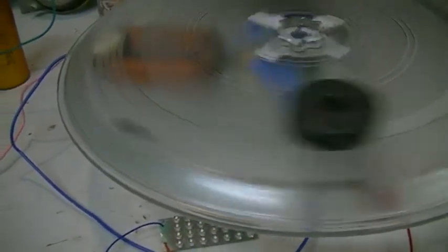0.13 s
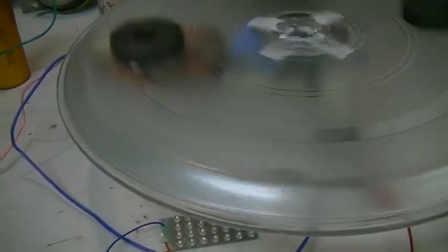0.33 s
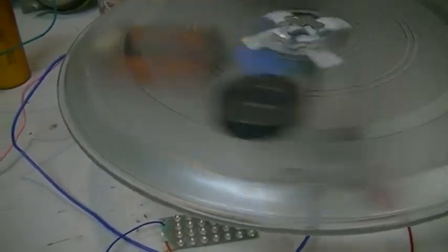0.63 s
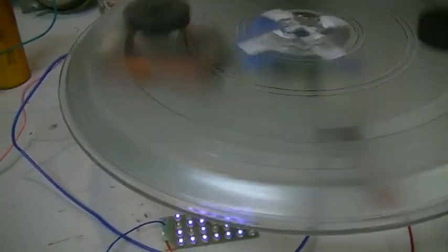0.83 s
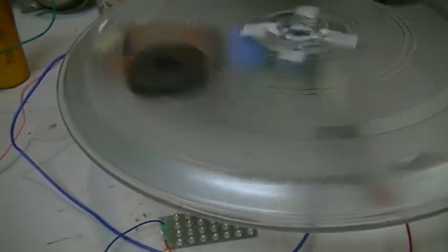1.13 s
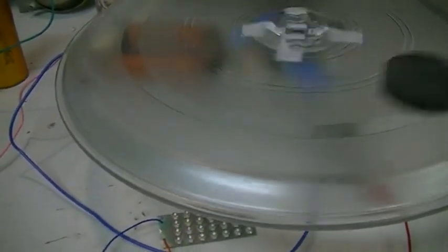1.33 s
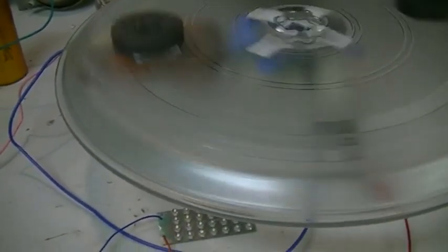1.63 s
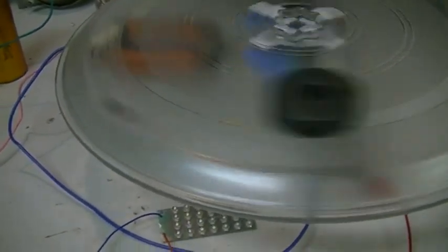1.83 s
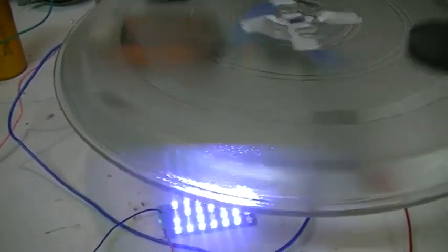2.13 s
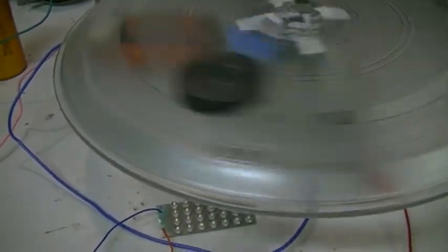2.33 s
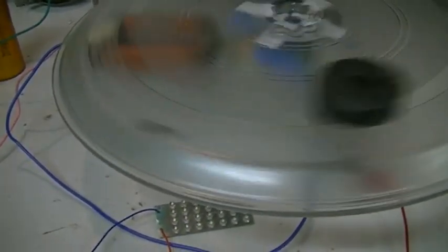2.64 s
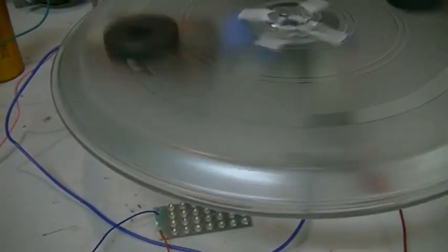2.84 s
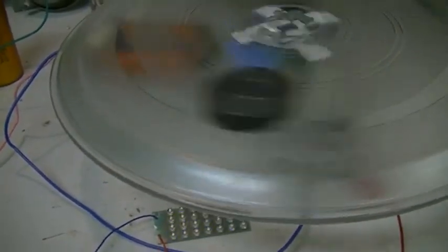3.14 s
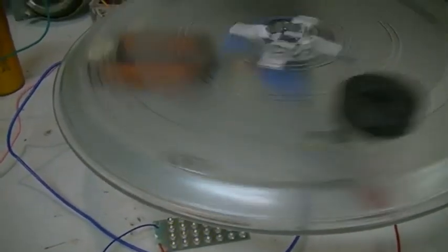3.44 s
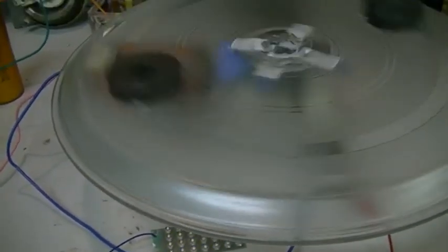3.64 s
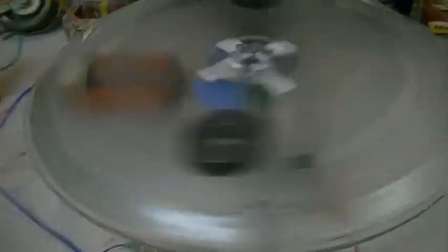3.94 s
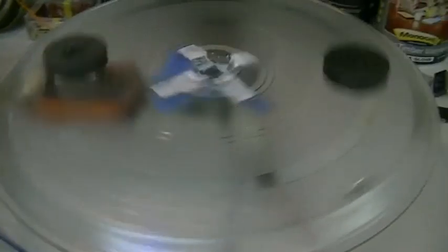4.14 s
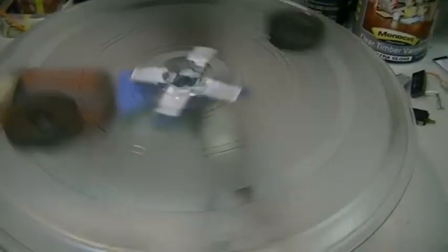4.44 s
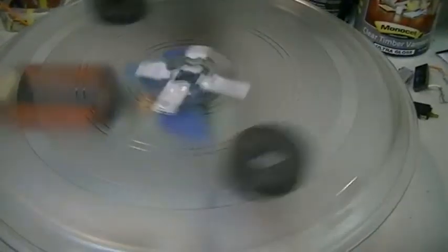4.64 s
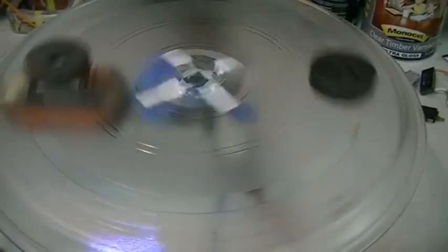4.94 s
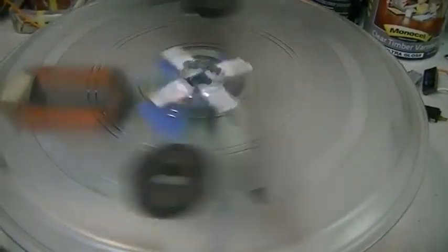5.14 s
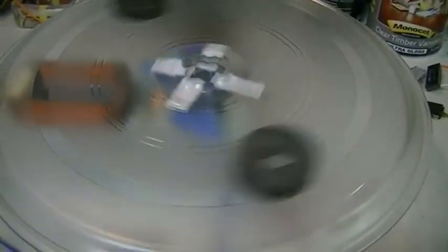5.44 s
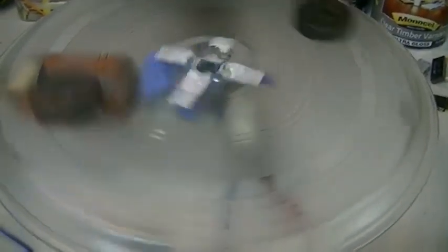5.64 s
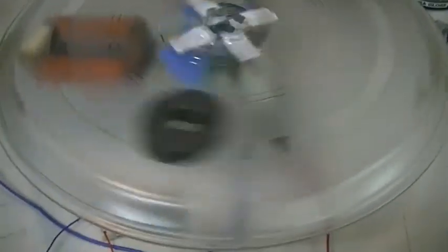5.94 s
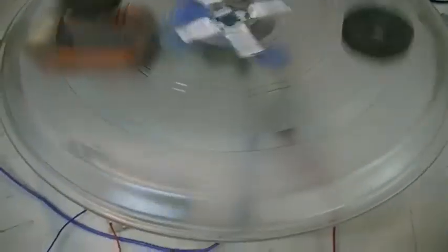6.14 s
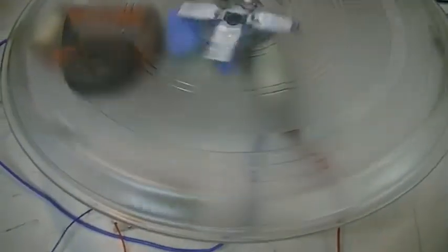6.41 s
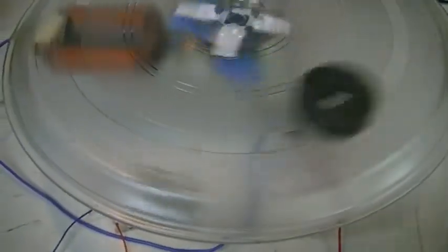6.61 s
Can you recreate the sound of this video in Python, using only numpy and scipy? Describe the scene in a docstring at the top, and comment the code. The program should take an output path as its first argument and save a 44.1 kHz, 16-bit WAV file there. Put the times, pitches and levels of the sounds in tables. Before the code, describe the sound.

Rapid double clicks of a small lever switch, slowly quickening, knock a spinning plastic lid above quiet airy motor whirr.

```python
"""A plastic lid with two magnets spins ever faster over a coil; each magnet in turn trips a micro switch.
On every pass the lever is touched, the contact snaps over, and the lever drags with a fine scrape.
Then the lever flies back in a quick run of blows that thumps the lid: ringing modes plus grainy noise.
Two stray taps, made of short ringing tones, fall between the clicks in the later part.
From start to end, noise through hollow resonances whirrs and broad noise hisses in a small workshop."""
import sys
import numpy as np
from scipy import signal
from scipy.io import wavfile
from scipy.ndimage import uniform_filter1d

SR = 44100
rng = np.random.default_rng(int(sys.argv[2]) if len(sys.argv) > 2 else 0)


def unload_audio(sound):
    """Save the sound as a 16-bit wav file, at the path given as the first command line argument."""
    columns = np.transpose(np.atleast_2d(sound))
    # keep every value between -1 and 1, then stretch to whole-number steps
    steps = np.round(np.clip(columns, -1, 1) * 32767)
    wavfile.write(sys.argv[1], SR, steps.astype(np.int16))


N = 298557

# All dB values are relative: several layers add a further offset where they are mixed.
# Ringing tones of the switch, each strength for the first and second magnet: pitch_hz, t60_s,
# touch_1_db, touch_2_db, snap_1_db, snap_2_db, release_1_db, release_2_db
SWITCH_MODES = [(2780, 0.012, -22, -26, -19, -15, -10, -16), (3283, 0.012, -14, -10, -20, -16, -7, -6),
                (3530, 0.012, -14, -11, -26, -21, -15, -12), (3886, 0.012, -10, -8, -21, -15, -14, -10),
                (4198, 0.025, -2, -2, -17, -16, -9, -5), (4750, 0.012, -13, -9, -16, -13, -8, -1),
                (5040, 0.012, -11, -14, -13, -9, -4, -1), (5260, 0.012, -10, -16, -15, -12, -3, -4),
                (6050, 0.012, -12, -10, -10, -12, -4, -8), (6520, 0.012, -17, -15, -18, -14, -5, -3),
                (6900, 0.012, -17, -14, -3, -5, -3, -5), (7215, 0.02, -17, -13, -3, -3, -9, -6),
                (7520, 0.012, -18, -16, -2, -3, 0, 0), (7805, 0.012, -25, -22, -7, -2, -9, -3),
                (8460, 0.012, -19, -16, -8, -9, -2, 0), (8900, 0.012, -21, -23, -11, -7, -4, -7),
                (9320, 0.012, -17, -17, -17, -13, -12, -8), (10050, 0.012, -19, -19, -11, -4, -10, -5),
                (10560, 0.012, -25, -27, -4, -2, -8, -11), (12020, 0.012, -33, -30, -15, -8, -18, -17),
                (12870, 0.012, -37, -38, -12, -12, -18, -19), (13780, 0.012, -39, -37, -19, -15, -21, -25)]
# Ringing tones of the thin lid: same columns as the switch
LID_MODES = [(344, 0.085, -22, -38, -34, -42, -28.5, -21.5),
             (423.5, 0.19, -35, -16.5, -27, -31, -22.5, -12.5), (584, 0.079, -21, -22, -8, -7, -6, -1),
             (717, 0.029, -12, -12, -20, -23, -0.5, -4), (913, 0.11, -19.5, -6.5, -33, -7.5, -28, -16),
             (1183, 0.04, -25, -17, -24, -7, -8, -14), (1395, 0.028, -11, -15, -29, -26, -13, -8),
             (1532, 0.041, -45, -44, -40, -33, -21, -19), (1925, 0.047, -34, -24, -35, -22, -22.5, -22.5),
             (2165, 0.03, -23, -24, -26, -32, -9.5, -7)]
# Broad noise colour of each kind of blow: pitch_hz, touch_db_per_hz, snap_db_per_hz, release_db_per_hz
CRACK_COLOUR = [(297, -18, -26, -19.5), (1034, -6, 4, -2.5), (2720, -2, -47, -7.5), (4500, 7.5, -29, -6),
                (8000, -9, 5.5, 0.5), (10100, -26, -7, -16), (13000, -28, -7, -30), (16100, -38, -19, -28)]
# Lever rattling on after it flies back: delay_s, level_db (compared with the stop)
RATTLE_BLOWS = [(.0072, -4.5), (.0145, -21), (.0175, -23)]
# Colour of the lever's drag between touch and release: pitch_hz, level_db_per_hz
RUB_COLOUR = [(300, -16), (550, -6), (900, -4), (1650, -16), (2600, -13), (3070, -5), (3600, -11),
              (4680, -15), (10500, -18), (16000, -36)]
# Stray taps: start_s, dull_level_db, bright_level_db
STRAY_TAPS = [(3.7174, -10.5, -18.5), (5.0386, -23, -13.5)]
# Ringing tones in the dull part of a tap: pitch_hz, level_db, t60_s
DULL_TAP_MODES = [(507, -46, 0.013), (860, -16, 0.028), (1146, 0, 0.018), (1490, 1, 0.011),
                  (1850, -6.5, 0.022)]
# Ringing tones in the bright part of a tap: pitch_hz, level_db, t60_s
BRIGHT_TAP_MODES = [(2300, -3, .005), (3200, -2, .005), (4900, -2, .005), (6650, 0, .005), (9000, -8, .004)]
# Reflections of the workshop: pitch_hz, level_db, t60_s
ROOM_BANDS = [(242, -12.5, 0.52), (570, -4, 0.19), (1490, -10.5, 0.29), (3240, -16, 0.37),
              (6450, -19, 0.35), (10800, -23, 0.34), (15000, -20.5, 0.39)]
# Treble of the clicks over time: start_s, level_db
TREBLE_COURSE = [(0.0, 1.8), (3.3, 1.5), (4.2, -1.3), (6.77, -0.22)]
# Hollow resonances of the whirr: pitch_hz, width_hz (sets how quickly each dies), level_db_per_hz
WHIRR_RESONANCES = [(263.4, 23, -8.5), (434.7, 17, -3.5), (541.5, 29.4, 0), (797.6, 65, -3),
                    (1115, 56, -11), (1381, 155, -12), (1970, 105, -16.5), (2258, 98, -12.5),
                    (2483, 78, -13), (3086, 17, -14.5)]
# Loudness of the whirr over time: start_s, level_db
WHIRR_COURSE = [(0.0, -40.5), (2.2, -40.5), (4.5, -42), (6.77, -41)]
# Colour of the hiss: pitch_hz, level_db_per_hz
HISS_COLOUR = [(18, -78), (30, -32.5), (223, -21), (368, -23.5), (547, -12), (659, -4.5), (792, -11),
               (1060, -15.5), (1940, -15), (7090, -29), (13000, -43), (15200, -39.5), (16500, -72)]

# Turning of the lid: speed at the start and its steady gain
PASSES = 17
TURNS_PER_S, SPEEDUP_TURNS_PER_S2 = 1.16323, .02214
# Pairs below: first magnet, second magnet. Angles in degrees where each contact falls
TOUCH_DEG, SNAP_DEG, RELEASE_DEG = (65.37, 242.98), (75.9, 253.07), (101.48, 282.29)
# Rough delays of the lever's stop and bounce after it flies back; each layer shifts them a little
STOP_S, BOUNCE_S = .0035, .0112
# Strength of each blow on the switch
TOUCH_DB, SNAP_DB, BACK_DB = (-10.5, -11.5), (-8.1, -10), (-8, -7)
STOP_DB, BOUNCE_DB = (-5, -5.5), (-16.5, -19.5)
# A faint high noisy onset just before the release
ONSET_S, ONSET_DB = .003, (-34, -25.5)
# Strength of each knock on the lid
LID_TOUCH_DB, LID_SNAP_DB = (-21.5, -22.5), (-23, -26)
LID_STOP_DB, LID_BOUNCE_DB = (-15, -13.5), (-14.5, -19)
LID_GROWS_DB_PER_S = 0.62   # the thump after the release swells as the microphone draws nearer
# Broad crack of touch, snap and release
CRACK_DB, CRACK_T60_S = (-22, -20.5, -17.5), (.036, .034, .026)
RUB_DB, HISS_DB = -43.5, -43.5
TREBLE_HZ, CUTOFF_HZ = 9750, 16700
TOUCH, SNAP, RELEASE = 0, 1, 2   # kinds of blow


def switch(rattle):
    """Metal spring and hard case ring bright and short; the start of the release reaches only high modes."""
    back_s = when(RELEASE_DEG)

    def cluster(spread_s):
        return lambda: chatter(PASSES, spread_s)

    blows = [
        (TOUCH, when(TOUCH_DEG), each(TOUCH_DB) - 3, cluster(0.00078), 0),
        (SNAP, when(SNAP_DEG), each(SNAP_DB) - 6, cluster(0.00096), 0),
        (RELEASE, back_s - ONSET_S, each(ONSET_DB), cluster(0.0012), 4300),
        (RELEASE, back_s, each(BACK_DB) - 6, cluster(0.00059), 4300),
        (RELEASE, back_s + STOP_S - .0006, each(STOP_DB) - 5.5, cluster(0.00044), 0),
        (RELEASE, back_s + BOUNCE_S - .001, each(BOUNCE_DB) - 0.5, cluster(0.00057), 0),
    ]
    for seconds, level_db in rattle:
        blows.append((RELEASE, seconds, level_db - 19, cluster(0.0005), 0))
    return strike(SWITCH_MODES, blows, scatter_db=1.5)


def cracks(rattle):
    """Many small modes of case and bracket blur into a short, grainy coloured noise at each blow."""
    back_s = when(RELEASE_DEG)
    touches = [(when(TOUCH_DEG), each(TOUCH_DB))]
    # the contact sounds alike both ways
    snaps = [(when(SNAP_DEG), each(SNAP_DB)), (back_s, each(BACK_DB) - 1.5)]
    landings = [(back_s + STOP_S - .0004, each(STOP_DB)),
                (back_s + BOUNCE_S - .0006, each(BOUNCE_DB)), *rattle]
    t = np.arange(SR // 10) / SR
    grains = rng.standard_normal((2, N)) * rng.exponential(1, N) ** .7
    noise = list(bands(grains))
    out = 0
    for kind, group in enumerate((touches, snaps, landings)):
        envelope = np.zeros(N)
        fade = (1 - np.exp(-t / .0004)) * from_db(-60 * t / CRACK_T60_S[kind])
        for seconds, level_db in group:
            add(envelope, seconds, from_db(level_db + 9.5), np.tile(fade, (len(seconds), 1)))
        colour = rms_one(sum(from_db(at_hz(CRACK_COLOUR, hz, axis=kind + 1)) * b for hz, b in noise))
        out = out + from_db(CRACK_DB[kind]) * envelope * colour
    return out


def rub():
    """While it is held down the lever drags with a fine grainy scrape."""
    held = np.zeros(N)
    for down, up in zip(when(TOUCH_DEG), when(RELEASE_DEG)):
        held[round(down * SR):round(up * SR)] = 1
    grains = rng.standard_normal((2, N)) * rng.exponential(1, N) ** 0.75
    scrape = rms_one(sum(from_db(at_hz(RUB_COLOUR, hz)) * b for hz, b in bands(grains)))
    return from_db(RUB_DB) * uniform_filter1d(held, size=200) * scrape


def lid():
    """The thin lid takes clean knocks; the sharp stop reaches its high modes, the bounce shakes it all."""
    back_s = when(RELEASE_DEG)
    stop_s = back_s + STOP_S + .0002
    bounce_s = back_s + BOUNCE_S - .0012
    nearer_db = LID_GROWS_DB_PER_S * back_s

    def knock():
        return np.ones((PASSES, 1))

    blows = [
        (TOUCH, when(TOUCH_DEG) + 0.00097, each(LID_TOUCH_DB), knock, 0),
        (SNAP, when(SNAP_DEG) + 0.00105, each(LID_SNAP_DB), knock, 0),
        (RELEASE, stop_s, each(LID_STOP_DB) + nearer_db, knock, 852),
        (RELEASE, bounce_s, each(LID_BOUNCE_DB) + nearer_db, knock, 0),
    ]
    return strike(LID_MODES, blows, scatter_db=2.0)


def taps():
    """Two dry taps close to the microphone ring briefly, rounded by a soft contact."""
    seconds, dull_db, bright_db = np.transpose(STRAY_TAPS)
    count = len(STRAY_TAPS)
    out = np.zeros(N)
    for modes, level_db in ((DULL_TAP_MODES, dull_db), (BRIGHT_TAP_MODES, bright_db)):
        for hz, mode_db, t60 in modes:
            force = np.zeros(N)
            shape = chatter(count, 0.00012) if hz > 2500 else np.ones((count, 1))
            add(force, seconds, from_db(level_db + mode_db), shape)
            out += ring(force, hz, t60)
    return signal.sosfilt(signal.butter(4, 7500, fs=SR, output="sos"), out)


def workshop(x):
    """A dense tail of reflections builds up over a few ms and dies band by band."""
    t = np.arange(SR // 2) / SR
    tail = 0
    for hz, b in bands(rng.standard_normal((2, len(t)))):
        tail = tail + b * from_db(at_hz(ROOM_BANDS, hz) - 60 * t / at_hz(ROOM_BANDS, hz, axis=2))
    return signal.fftconvolve(x, tail * (1 - np.exp(-t / .007)))[:N]


def treble(x):
    """The top of the clicks dulls as the microphone shifts away from the switch."""
    top = signal.sosfiltfilt(signal.butter(2, TREBLE_HZ, "high", fs=SR, output="sos"), x)
    seconds, level_db = np.transpose(TREBLE_COURSE)
    gain = from_db(np.interp(np.arange(N) / SR, seconds, level_db))
    return x + (gain - 1) * top


def whirr():
    """Noise sounds through a row of hollow resonances, each on its own draw."""
    out = 0
    for hz, width, level_db in WHIRR_RESONANCES:
        tone = rms_one(ring(rng.standard_normal(N), hz, 3.7 / width))
        out = out + from_db(level_db) * np.sqrt(width) * tone
    # thin out what lies below the lowest resonance
    out = signal.sosfilt(signal.butter(3, 220, "high", fs=SR, output="sos"), out)
    seconds, level_db = np.transpose(WHIRR_COURSE)
    return from_db(np.interp(np.arange(N) / SR, seconds, level_db)) * rms_one(out)


def hiss():
    """Smooth broad noise of air and microphone."""
    white = rng.standard_normal((2, N))
    return from_db(HISS_DB) * rms_one(sum(from_db(at_hz(HISS_COLOUR, hz)) * b for hz, b in bands(white)))


def when(degrees):
    """Times at which the evenly accelerating lid brings its two magnets, in turn, to these angles."""
    turns = np.arange(PASSES) // 2 + np.resize(degrees, PASSES) / 360
    return 2 * turns / (TURNS_PER_S + np.sqrt(TURNS_PER_S ** 2 + 2 * SPEEDUP_TURNS_PER_S2 * turns))


def each(pair):
    """One value per pass, the two magnets in turn."""
    return np.resize(np.asarray(pair, float), PASSES)


def rattles():
    """Times and levels of the small uneven blows that follow each release."""
    luck = rng.standard_normal((PASSES, len(RATTLE_BLOWS), 2))
    blows = []
    for k, (late_s, drop_db) in enumerate(RATTLE_BLOWS):
        seconds = when(RELEASE_DEG) + late_s + 0.00074 * luck[:, k, 0]
        level_db = each(STOP_DB) + drop_db + 0.99 * luck[:, k, 1]
        blows.append((seconds, level_db))
    return blows


def chatter(count, spread_s):
    """A blow is a cluster of tiny contacts that swells and fades within a few ms; unit energy."""
    t = np.arange(400) / SR / spread_s
    grains = rng.standard_normal((count, 400)) * rng.exponential(1, (count, 400)) * t * np.exp(-t)
    return grains / np.sqrt(np.sum(grains ** 2, axis=1, keepdims=True))


def strike(modes, blows, scatter_db):
    """Blows (kind, s, dB, shapes, lowest Hz reached) ring each mode by the strength of kind and magnet."""
    out = np.zeros(N)
    for hz, t60, *strength_db in modes:
        force = np.zeros(N)
        for kind, seconds, level_db, shapes, low_hz in blows:
            shape = shapes()
            # how hard the cluster pushes at this mode's pitch
            push = np.abs(shape @ np.exp(-2j * np.pi * hz * np.arange(shape.shape[1]) / SR))
            share_db = np.reshape(strength_db, (3, 2))[kind][np.arange(len(seconds)) % 2]
            luck_db = scatter_db * rng.standard_normal(len(seconds))
            gains = from_db(level_db + share_db + luck_db)
            low_cut = 1 + (low_hz / hz) ** 8
            add(force, seconds, gains / np.maximum(push, .4) / low_cut, shape)
        out += ring(force, hz, t60)
    return out


def ring(clicks, hz, t60):
    """A unit click sets a dying sine ringing from a height of about 1."""
    r = from_db(-60 / (max(t60, .002) * SR))
    w = 2 * np.pi * hz / SR
    return signal.lfilter([0, np.sin(w)], [1, -2 * r * np.cos(w), r * r], clicks + 1e-18)


def bands(white):
    """Half-octave bands of noise with their centres; neighbours come from unrelated draws."""
    edges = 25 * 2 ** np.arange(0, 9.6, .5)
    for k, (low, high) in enumerate(zip(edges, edges[1:])):
        band = signal.butter(2, [low, high], "band", fs=SR, output="sos")
        yield np.sqrt(low * high), signal.sosfilt(band, white[k % 2])


def add(track, seconds, gains, shapes):
    """Lay one short shape per event into the track."""
    at = np.round(np.asarray(seconds) * SR).astype(int)[:, None] + np.arange(shapes.shape[1])
    np.add.at(track, np.minimum(at, N - 1), gains[:, None] * shapes)


def at_hz(points, hz, axis=1):
    """Read a column of a table on a log-frequency axis."""
    points = np.array(points)
    return np.interp(np.log(hz), np.log(points[:, 0]), points[:, axis])


def from_db(db):
    """Decibels to gain."""
    return 10 ** (np.asarray(db) / 20)


def rms_one(x):
    """Scale to unit rms."""
    return x / np.sqrt(np.mean(x ** 2) + 1e-20)


def scene():
    """Clicks and taps with their room, over the whirr and hiss."""
    rattle = rattles()
    rings, noises = switch(rattle), cracks(rattle) + rub()
    thumps, near = lid(), taps()
    # narrow rings beam at the microphone, less at the walls
    to_walls = from_db(-5) * rings + noises + from_db(-8) * thumps + from_db(-16) * near
    clicks = rings + noises + thumps + near + from_db(-19.0) * workshop(to_walls)
    # small bodies radiate no bass
    clicks = signal.sosfilt(signal.butter(4, 270, "high", fs=SR, output="sos"), clicks)
    return (treble(clicks) + whirr() + hiss())[None]


def record(dry):
    """A small microphone without bass; peaks are rounded, the top is cut."""
    thin = signal.sosfilt(signal.butter(2, 60, "high", fs=SR, output="sos"), dry)
    rounded = 0.7 * np.tanh(thin / 0.93)
    return signal.sosfilt(signal.cheby2(12, 70, CUTOFF_HZ, fs=SR, output="sos"), rounded)


dry = scene()
out = record(dry)
unload_audio(out)
```